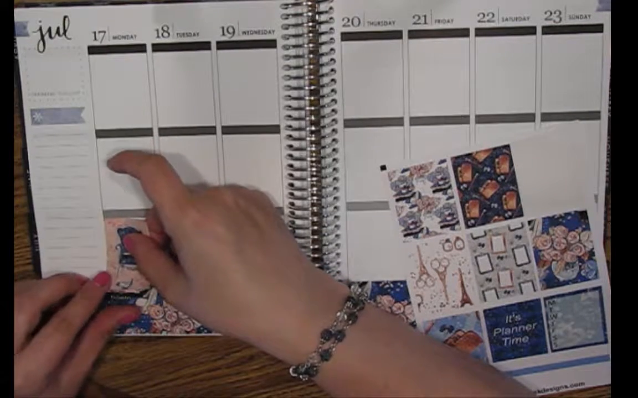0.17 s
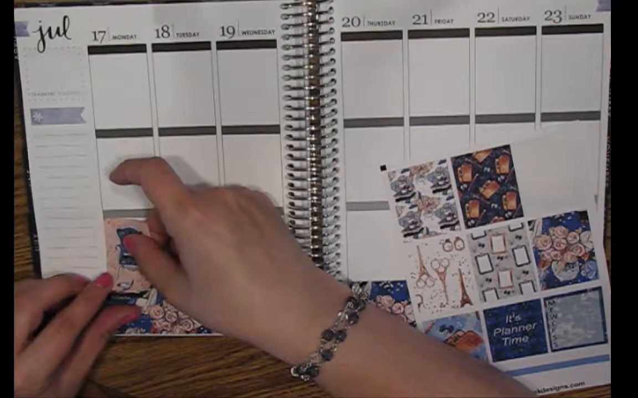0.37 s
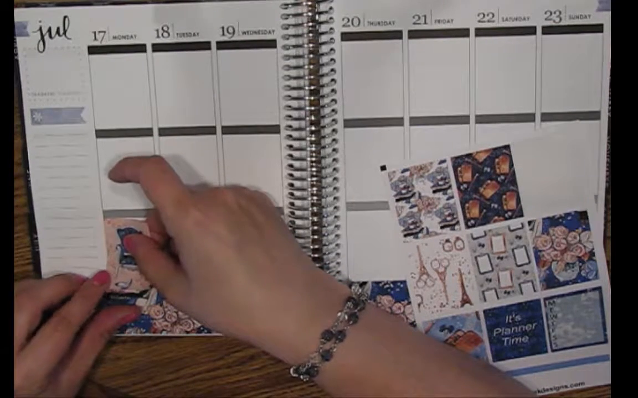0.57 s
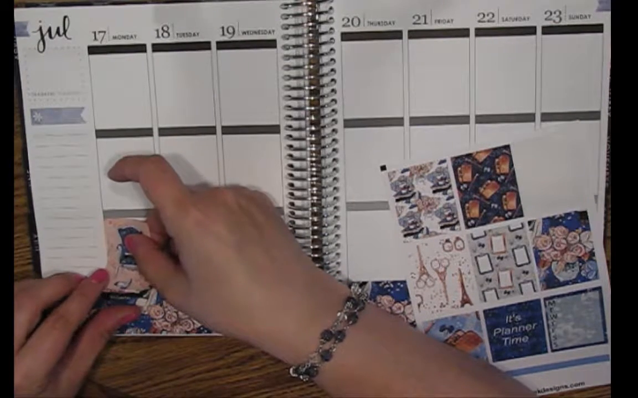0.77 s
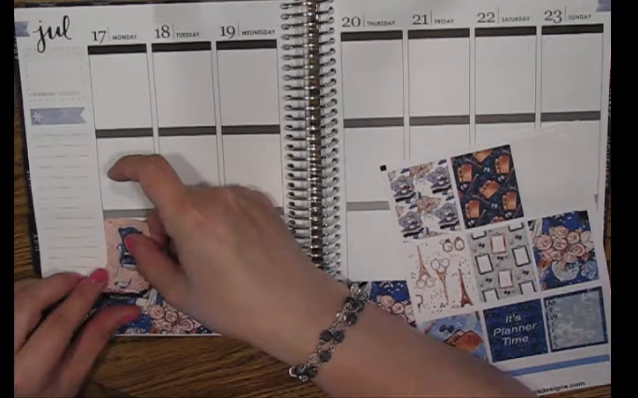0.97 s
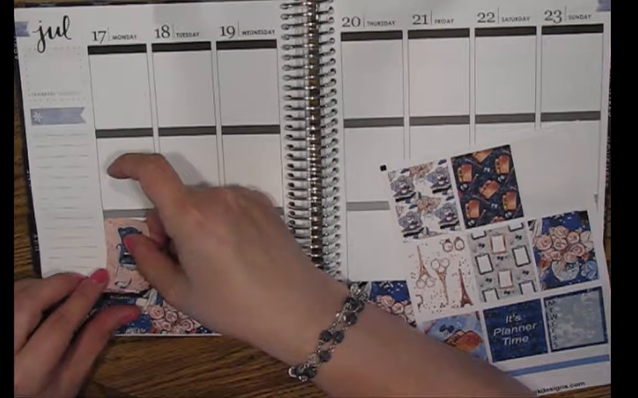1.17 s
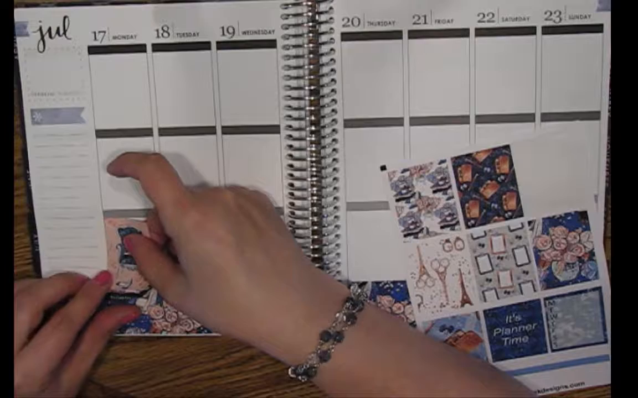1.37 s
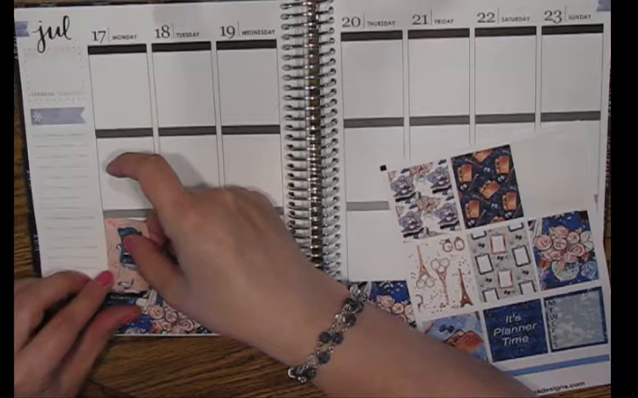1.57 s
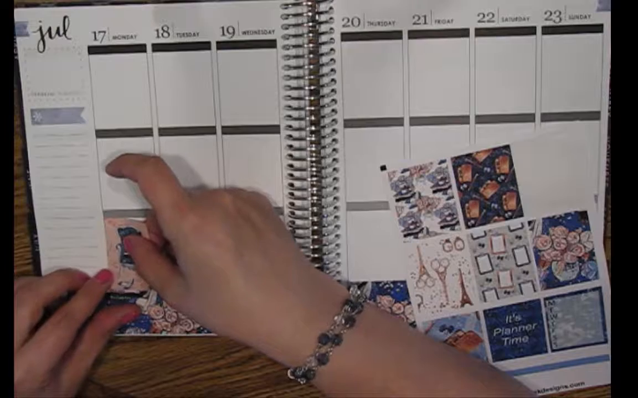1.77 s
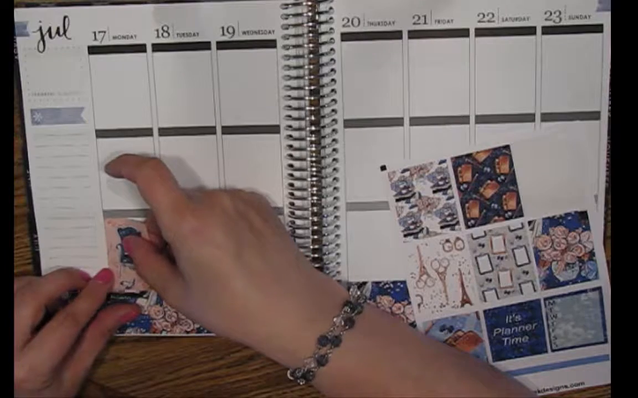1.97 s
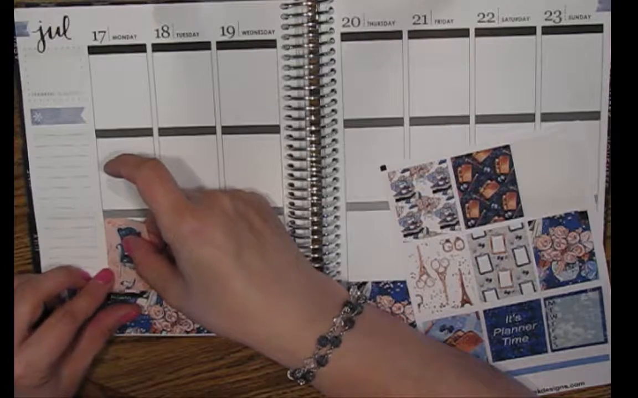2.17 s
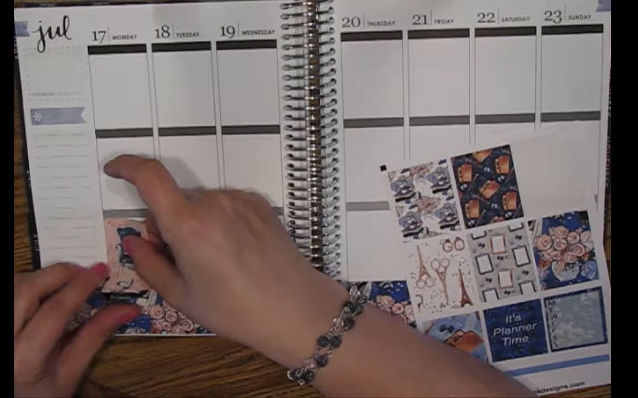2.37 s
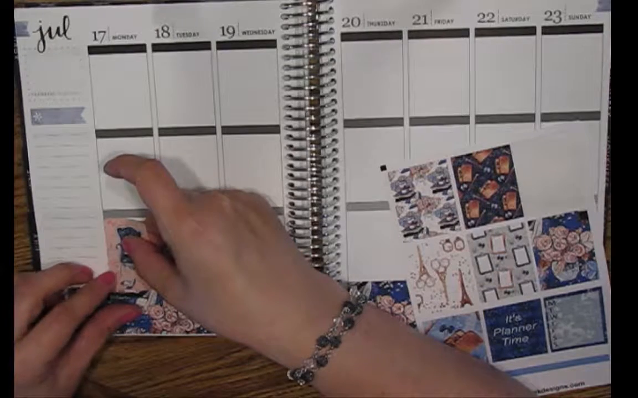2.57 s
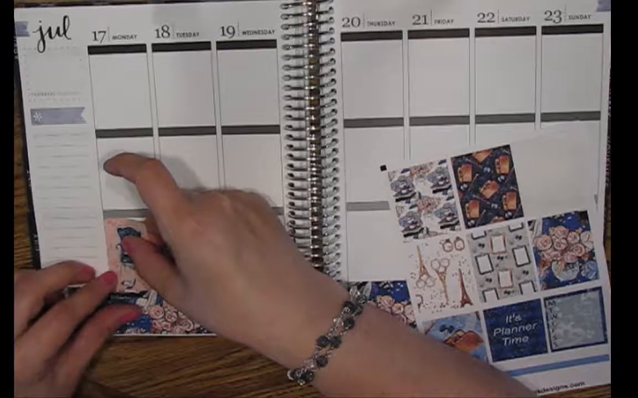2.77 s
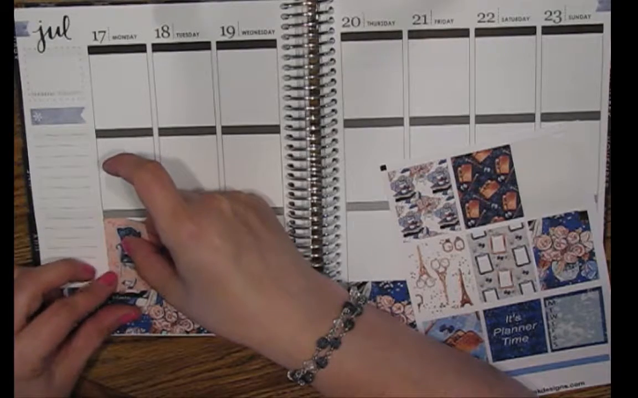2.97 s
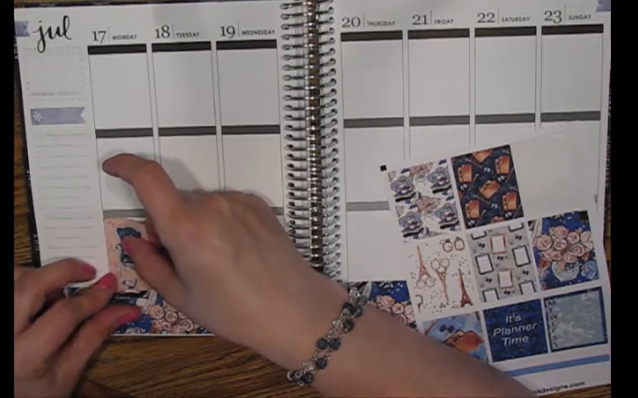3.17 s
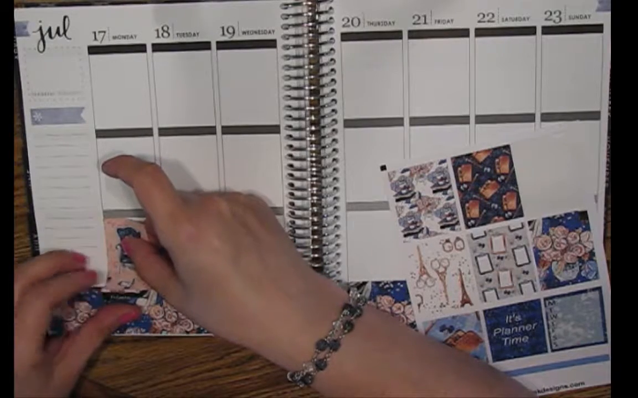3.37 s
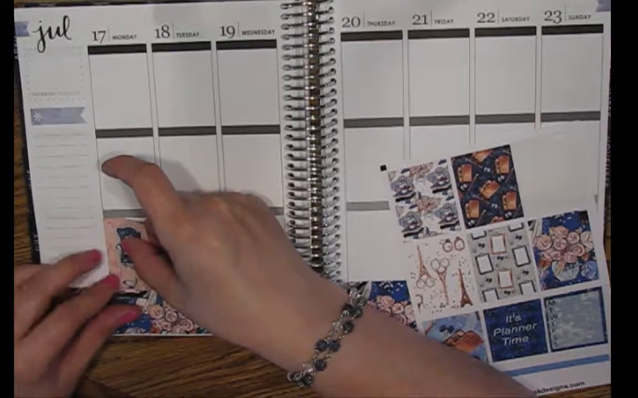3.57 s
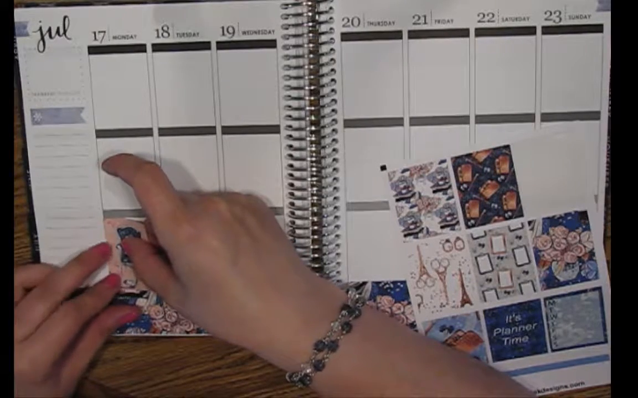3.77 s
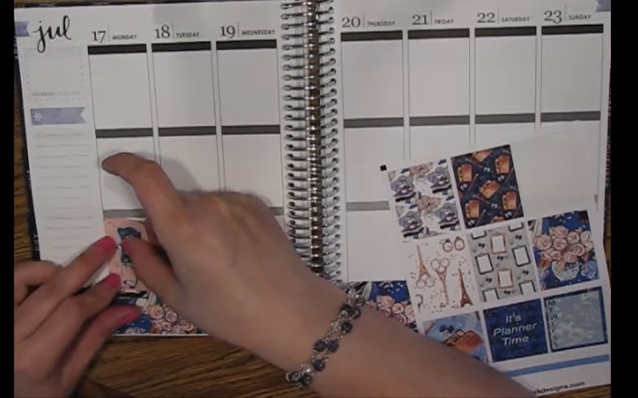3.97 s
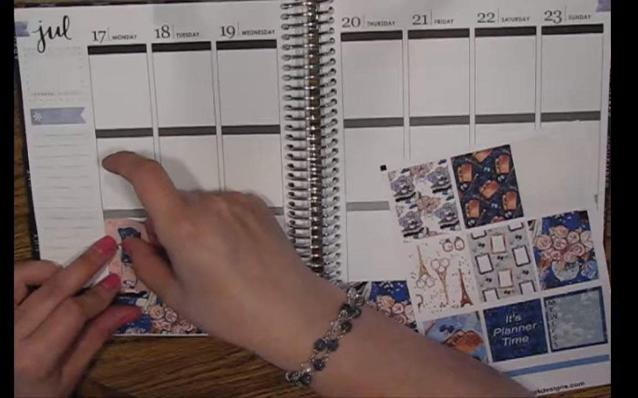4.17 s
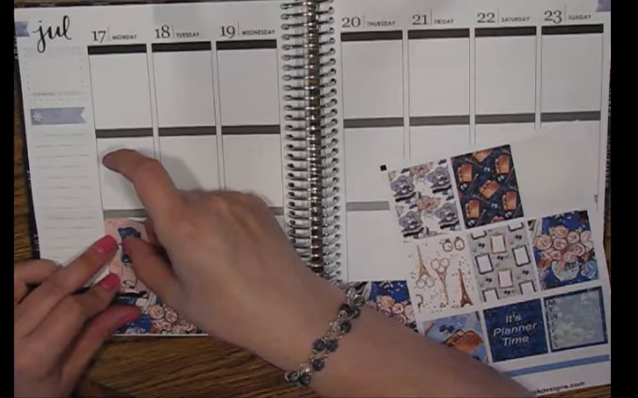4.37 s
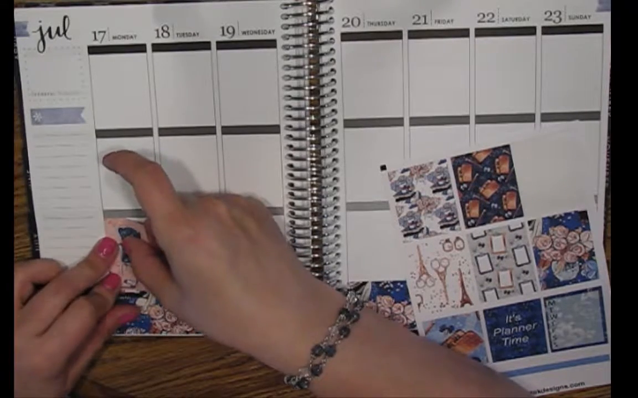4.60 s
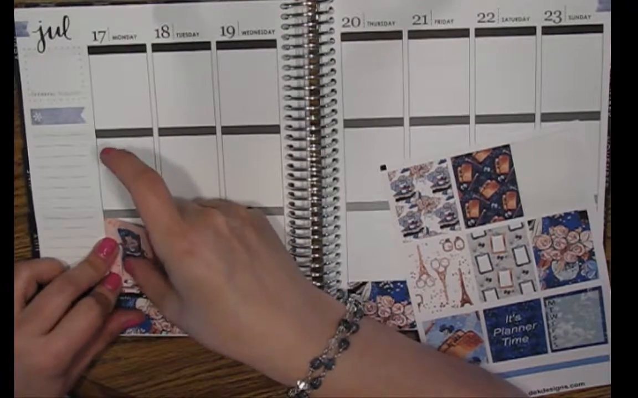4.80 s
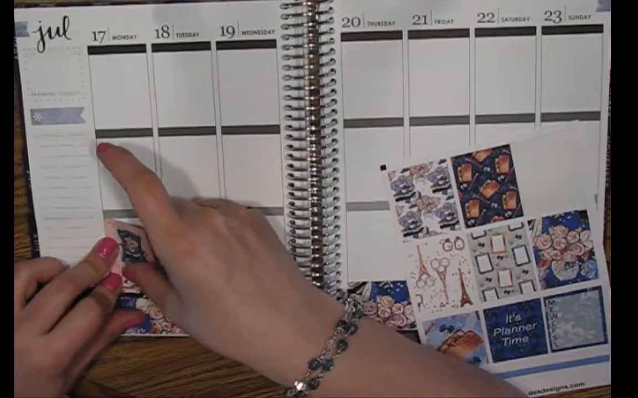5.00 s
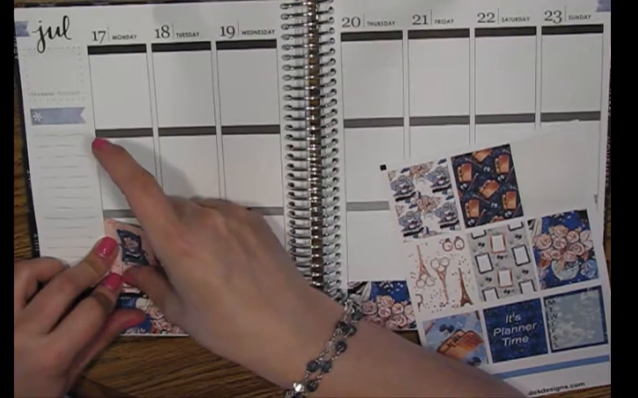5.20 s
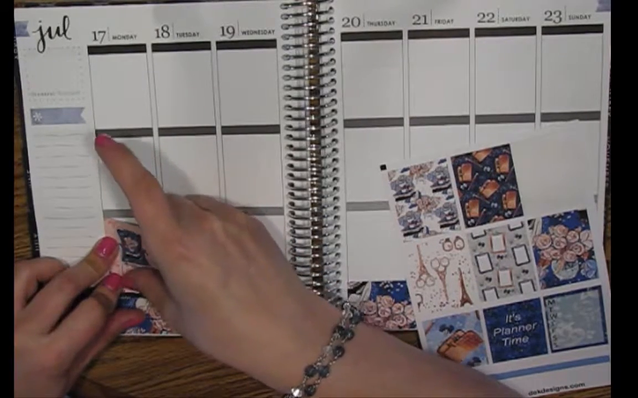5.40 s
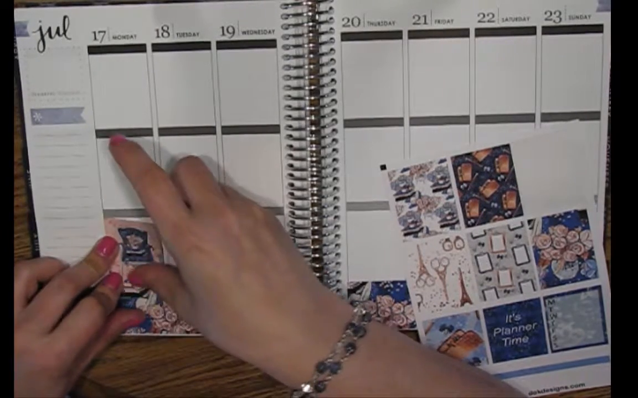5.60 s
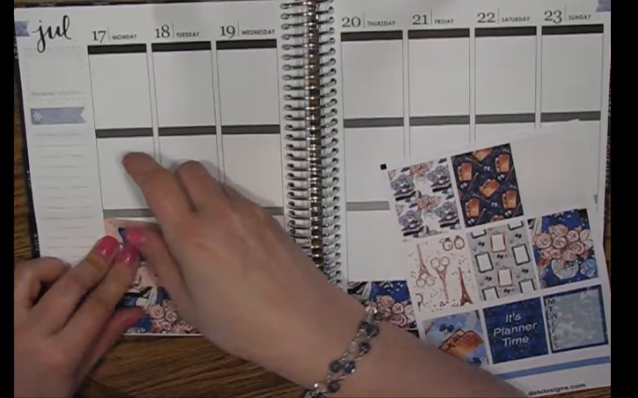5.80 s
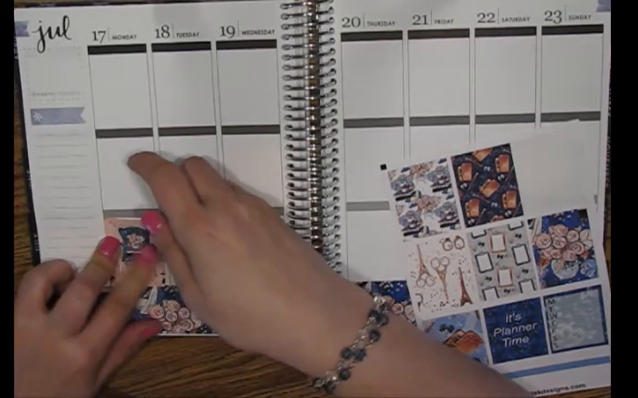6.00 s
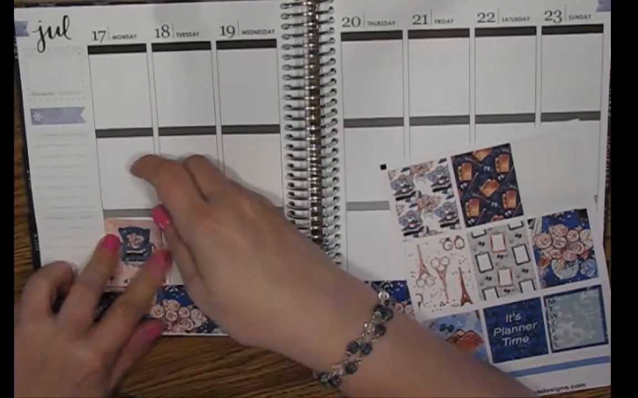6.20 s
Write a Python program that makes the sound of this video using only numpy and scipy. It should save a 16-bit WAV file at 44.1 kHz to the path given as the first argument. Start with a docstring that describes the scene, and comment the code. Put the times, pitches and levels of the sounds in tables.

```python
"""Fingertips press and smooth a paper sticker onto a planner page on a wooden desk in a small room.
Glue and stiff paper tick, as sharp breaks with short crackles, and once snap loudly with a dying peel;
skin rustles over the page as dense grains, and hard presses knock as short ringing tones.
Behind it an appliance hums at twice the mains rate, over a drone of moving air and a faint high whine,
made of steady tones, coloured noise and noise through narrow resonances."""
import sys
import numpy as np
from scipy import signal
from scipy.fft import rfft, irfft
from scipy.io import wavfile

SR = 44100
rng = np.random.default_rng(int(sys.argv[2]) if len(sys.argv) > 2 else 0)


def transcribe(signal):
    """Save signal, clipped to [-1, 1], as a 16-bit WAV file at the path in sys.argv[1]."""
    frames = np.atleast_2d(signal).T
    limited = np.clip(frames, -1, 1)
    pcm = np.round(limited * 32767).astype(np.int16)
    wavfile.write(sys.argv[1], SR, pcm)


N = 275492

# steady wash of moving air, spectrum shape: pitch_hz, level_db (per Hz)
AIR_SPECTRUM = [(20, -21), (60, -21), (90, -10.5), (170, -9), (250, -10.5), (295, -17.5), (570, -23),
                (1030, -26), (1150, -32.5), (2000, -41), (4000, -47), (8000, -52.5), (10000, -55),
                (16000, -63)]
# air noise ringing in duct and room: pitch_hz, width_hz (of one pass), level_db (rms)
DRONE_MODES = [(242, 45, -61), (350.7, 58, -56.5), (491, 33, -53), (635.6, 90, -62), (764.5, 65, -68),
               (1012.7, 29, -68)]
# faint high whine: pitch_hz, width_hz (of one pass), level_db (rms)
WHINE_MODES = [(7340, 160, -85.5), (7910, 600, -86), (8250, 49, -99)]
# appliance hum: pitch_hz, level_db (rms)
HUM_TONES = [(119.9, -43.5), (479.6, -61)]
# short scuffs of a fingertip starting or stopping: start_s, level_db (rms), hold_s (from the start)
SCUFF_EVENTS = [(.88, -77, .04), (.96, -75, .04), (1.46, -78, .03), (1.93, -76, .03), (2.496, -69.5, 0.058),
                (2.66, -63, 0.017), (3.395, -69, 0.019), (3.513, -64, 0.023), (3.577, -71, 0.026),
                (3.66, -72, .015), (3.785, -64.5, .012), (3.975, -75, .015), (4.006, -69, .015),
                (4.581, -74.5, .015), (4.824, -57, 0.02), (4.89, -63, .012), (4.927, -58, 0.013),
                (4.995, -61.5, 0.021), (5.052, -65, 0.033), (5.279, -55, 0.016), (5.335, -63, 0.019),
                (5.441, -56.5, 0.022), (5.556, -57, 0.011), (5.641, -57.5, 0.016), (6.153, -59, .015),
                (6.21, -60, .04)]
# scuff colour: pitch_hz, level_db (per Hz)
SCUFF_SPECTRUM = [(1200, -18), (3000, -16), (4300, -9), (5050, 0), (5800, -10), (6800, -4), (7700, 0),
                  (8600, -10), (10500, -21), (13000, -22), (16000, -34)]
# strokes of skin sliding on the page: start_s, length_s, level_db (rms before the sag)
STROKE_EVENTS = [(2.898, 0.18, -71), (3.538, 0.19, -69.5), (3.96, 0.098, -66.5), (4.822, 0.27, -59.5),
                 (5.412, 0.22, -63), (5.666, 0.41, -57.5), (6.164, 0.36, -54.5)]
# stroke colour: pitch_hz, level_db (per Hz)
RUSTLE_SPECTRUM = [(1200, -2), (2800, -12), (4000, -4), (5000, -8.5), (6000, -4.5), (7500, 1), (8300, -4.5),
                   (9000, -10), (10500, -21), (13000, -17), (16000, -36)]
# dull knocks of the pad under the page when a press lands hard:
# start_s, level_db (peak), pitch_hz, decay_cycles (until 60 dB down)
KNOCK_EVENTS = [(2.52, -47, 860, 11), (3.479, -41, 700, 11), (4.924, -43, 700, 9), (5.002, -45, 942, 2),
                (5.28, -44, 1410, 9), (5.349, -35, 1250, 17), (5.349, -43, 2250, 10), (5.39, -47, 1250, 8),
                (5.482, -45, 1360, 14), (5.5615, -46, 1000, 2.5), (5.6736, -34.5, 733, 58),
                (5.6755, -35, 470, 24), (5.674, -40, 600, 18), (5.673, -38, 920, 14),
                (6.1565, -44, 1030, 2.5), (6.216, -50, 1030, 3)]
# paper ticks and snaps: start_s, level_db (peak of the crackle), tilt_db (per octave),
# sizzle_db and body_db (peaks relative to level_db)
TICK_EVENTS = [(2.521, -44, -6.5, -20, -6), (2.66, -48, -2, -25, -12), (2.675, -50, 8, -30, -25),
               (2.901, -35.5, -5, -35, -13), (3.4425, -54, 9, -17, -10), (3.479, -37.5, -3, -22, -11),
               (3.4852, -47, 1, -30, -20), (3.5075, -44, 14, -30, -25), (3.515, -39.5, 1, -37, -23),
               (3.5195, -46, -6, -35, -25), (4.004, -47, -1, -30, -15), (4.781, -57, 2, -20, 2),
               (4.825, -50, 1, -20, -15), (4.896, -50, 6, -25, -15), (4.924, -43, 6, -30, -15),
               (4.937, -44, 8, -30, 1.5), (4.953, -51, 3, -26, 2), (5.001, -48, 10, -25, -2),
               (5.2478, -58, -12, -25, 4), (5.279, -40, 5, -22, -7), (5.349, -64, -12, -34, 20),
               (5.483, -52, -11, -22, 7), (5.5606, -38.5, 5, -9, -2), (5.6736, -5, 0.5, -34, -35),
               (5.6764, -9.5, 2.5, -35, -44), (5.6781, -15, -5, -35, -44), (5.683, -17, 2, -35, -40),
               (5.6859, -18, -3, -35, -40), (5.6899, -22.5, 4, -35, -40), (5.853, -34, 3, -18, -25),
               (5.867, -32, 5, -17, -25), (5.967, -44, 6, -24, -17), (6.1573, -39, 4, -13, -4),
               (6.216, -34.5, -1, -11, -7), (6.2434, -41, -1.5, -20, -15)]
# smoother, less resonant colour of the small ticks: pitch_hz, level_db (per Hz)
SMALL_TICK_SPECTRUM = [(1500, -35), (2800, -25), (3400, -10), (4400, -1), (5200, -3.5), (6000, -10),
                       (7000, 0), (7900, -3), (8700, -13), (9300, -22), (10500, -40), (16000, -91)]
# colour of the loud snaps: pitch_hz, level_db (per Hz)
SNAP_SPECTRUM = [(1500, -36.5), (2950, -35), (3400, -10), (3780, -16), (4070, -9), (4350, -10.5),
                 (4800, 1.5), (5300, -6), (5700, -8), (6150, -7), (6600, -6), (7300, 0), (8100, -5),
                 (8700, -13.5), (9300, -29), (10500, -48), (16000, -91)]
# colour of the peeling crackle: pitch_hz, level_db (per Hz)
PEEL_SPECTRUM = [(900, -22), (1500, -13), (2900, -16), (3500, -5), (4050, 4), (4800, 1), (5570, 6),
                 (7400, 2), (8300, -1), (8900, -37), (11000, -52), (13000, -23), (16000, -45)]
# resonances of the sheet: pitch_hz, width_hz (of one pass), level_db (relative)
SHEET_MODES = [(3710, 52, -5), (4030, 100, -4), (4410, 37, -1), (4730, 160, -1), (5060, 84, -5),
               (5400, 53, 3), (5700, 50, -2), (6020, 38, -5), (6790, 40, -10), (7100, 41, -4),
               (7460, 68, -3), (7950, 150, -7)]
# desk reflection: delay_s, level_db (relative to direct)
DESK_ECHOES = [(.0027, -17)]

AIR_DB = -48.5  # rms
SWELL_HZ, DRONE_SWELL_DB, WHINE_SWELL_DB = (1.55, 7), 2.0, 2  # swell rates; rms swings
HUM_WAVER_DB = 0.3  # rms swing
GRAINS_PER_S, GRAIN_SPREAD_DB = 10000, 2.5
CLUMPS_HZ, RUB_CLUMPS_DB, PEEL_CLUMPS_DB = (17, 90), 2, 2.2  # bunching rates; rms swings
SCUFF_RISE_S, SCUFF_FADE_S = 0.0012, 0.011
STROKE_ATTACK_S, STROKE_SAG_DB, STROKE_RELEASE_S = 0.037, 3, 0.13
# crackle decay time at a reference tick level; it doubles for so many dB more
CRACKLE_S, CRACKLE_AT_DB, CRACKLE_DOUBLES_DB = 0.00096, -40, 40
SNAP_FROM_DB = -25
BODY_HZ, SIZZLE_HZ = (1010, 4600), (11600, 14300)  # page flexing under a tick; top sizzle
# the glue keeps letting go after the snap; level is the crackle's rms before its rise and decay
PEEL_S, PEEL_DB, PEEL_RISE_S, PEEL_T60_S = 5.684, -33.5, 0.019, 0.5
PEEL_PER_S, PEEL_SPREAD_DB = 7600, 3
SHEET_DB, SHEET_SWELL_DB = -2, 4  # ringing relative to crackle; rms swing of each resonance
ROOM_T60_S, ROOM_RISE_S, ROOM_DB = 0.57, 0.012, -14  # tail energy relative to direct
CUTOFF_HZ = 15750


def from_db(db):
    """Decibels to gain."""
    return 10 ** (np.asarray(db) / 20)


def rms_one(x):
    """Scale to rms 1."""
    return x / np.sqrt(np.mean(x ** 2) + 1e-20)


def coloured(x, spectrum):
    """Causal (minimum-phase) filter with the given dB-per-Hz shape."""
    hz, db = np.transpose(spectrum)
    grid = np.maximum(np.fft.rfftfreq(8192, 1 / SR), 1)
    shape_db = np.interp(np.log(grid), np.log(hz), db)
    # folding the cepstrum forward in time makes the response minimum-phase
    cepstrum = irfft(np.log(from_db(shape_db)))
    cepstrum[1:4096] *= 2
    cepstrum[4097:] = 0
    response = irfft(np.exp(rfft(cepstrum)))
    return signal.fftconvolve(x, response)[:N]


def band(x, edges_hz, order):
    """Butterworth band-pass."""
    sos = signal.butter(order, edges_hz, "band", fs=SR, output="sos")
    return signal.sosfilt(sos, x + 1e-18)


def ringing_noise(modes, swell_db):
    """White noise goes twice through each resonance, which swells and sinks irregularly on its own."""
    settle = 9000  # samples dropped while the resonance builds
    out = np.zeros(N)
    for hz, width_hz, db in modes:
        r = np.exp(-np.pi * width_hz / SR)
        section = [1, 0, -1, 1, -2 * r * np.cos(2 * np.pi * hz / SR), r * r]
        swell = rms_one(band(rng.standard_normal(N + SR), SWELL_HZ, order=1)[SR:])
        noise = rng.standard_normal(N + settle)
        ringing = signal.sosfilt([section, section], noise)[settle:]
        out += from_db(db) * rms_one(from_db(swell_db * swell) * ringing)
    return out


def grains(per_s, spread_db, clumps_db, spectrum):
    """Random clicks of uneven size that come in bunches, coloured; rms 1."""
    sizes = from_db(spread_db * np.minimum(rng.exponential(1, N), 5))
    signed = sizes * rng.choice([-1, 1], N)
    clumps = from_db(clumps_db * rms_one(band(rng.standard_normal(N), CLUMPS_HZ, order=1)))
    fires = rng.random(N) < per_s / SR
    return rms_one(coloured(clumps * signed * fires, spectrum))


def add(out, sound, s, db):
    """Mix a short sound into out at time s with the given peak level."""
    at = round(s * SR)
    part = out[at:at + len(sound)]
    part += from_db(db) * sound[:len(part)] / np.abs(sound).max()


def air():
    """Moving air as steady noise, strongest in the lows."""
    return from_db(AIR_DB) * rms_one(coloured(rng.standard_normal(N), AIR_SPECTRUM))


def drone():
    """Air noise rings in duct and room resonances."""
    return ringing_noise(DRONE_MODES, DRONE_SWELL_DB)


def whine():
    """Noise in high resonances makes a faint, uneven whine."""
    return ringing_noise(WHINE_MODES, WHINE_SWELL_DB)


def hum():
    """Appliance tones at twice the mains rate and a multiple of it, their level wavering a little."""
    t = np.arange(N) / SR
    waver = rms_one(band(rng.standard_normal(N + 2 * SR), (1.5, 6), order=1)[2 * SR:])
    tones = sum(from_db(db) * np.sin(2 * np.pi * hz * t) for hz, db in HUM_TONES)
    return np.sqrt(2) * from_db(HUM_WAVER_DB * waver) * tones


def rub():
    """Skin ridges catch on paper fibres: dense uneven grains under long strokes and sudden scuffs."""
    t = np.arange(N) / SR
    stroke_level, scuff_level = np.zeros((2, N))
    for s, db, hold in SCUFF_EVENTS:
        rise = np.clip((t - s) / SCUFF_RISE_S, 0, 1)
        fade = np.exp(-np.maximum(t - s - hold, 0) / SCUFF_FADE_S)
        scuff_level += from_db(db) * rise * fade
    # a stroke swells in, sags, then lifts off
    for s, length, db in STROKE_EVENTS:
        attack = np.clip((t - s) / STROKE_ATTACK_S, 0, 1)
        sag = from_db(-STROKE_SAG_DB * np.clip((t - s) / length, 0, 1))
        release = np.exp(-np.maximum(t - s - length, 0) / STROKE_RELEASE_S)
        stroke_level += from_db(db) * attack * sag * release
    strokes = stroke_level * grains(GRAINS_PER_S, GRAIN_SPREAD_DB, RUB_CLUMPS_DB, RUSTLE_SPECTRUM)
    scuffs = scuff_level * grains(GRAINS_PER_S, GRAIN_SPREAD_DB, RUB_CLUMPS_DB, SCUFF_SPECTRUM)
    return strokes + scuffs


def knocks():
    """The pad under the page rings as a decaying tone when a press lands hard."""
    t = np.arange(3000) / SR
    out = np.zeros(N)
    for s, db, hz, cycles in KNOCK_EVENTS:
        decay = from_db(-60 * hz * t / max(cycles, 1))
        tone = np.sin(2 * np.pi * hz * t) * decay
        add(out, band(tone, (350, 2600), order=2), s, db)
    return out


def ticks():
    """Each tick is a sharp break with a short crackle behind it, longer for stronger breaks."""
    t = np.arange(3000) / SR
    out = np.zeros(N)
    for s, db, tilt_db, sizzle_db, body_db in TICK_EVENTS:
        decay_s = CRACKLE_S * 2 ** ((db - CRACKLE_AT_DB) / CRACKLE_DOUBLES_DB)
        decay = np.exp(-t / np.clip(decay_s, 0.0002, 0.015))
        burst = 0.33 * rng.standard_normal(len(t)) * decay
        burst[0] = 1  # the break itself
        spectrum = SNAP_SPECTRUM if db > SNAP_FROM_DB else SMALL_TICK_SPECTRUM
        # the tilt pivots at 5500 Hz
        tilted = [(hz, level + tilt_db * np.log2(hz / 5500)) for hz, level in spectrum]
        add(out, coloured(burst, tilted)[:len(t)], s, db)
        add(out, band(burst, SIZZLE_HZ, order=2), s, db + sizzle_db)
        add(out, band(burst, BODY_HZ, order=2), s, db + body_db)
    return out


def peel():
    """Glue lets go behind the snap: uneven crackle and ringing of the sheet die away together."""
    since = np.arange(N) / SR - PEEL_S
    rise = np.clip(since / PEEL_RISE_S, 0, 1)
    level = rise * from_db(PEEL_DB - 60 * np.maximum(since, 0) / PEEL_T60_S)
    crackle = grains(PEEL_PER_S, PEEL_SPREAD_DB, PEEL_CLUMPS_DB, PEEL_SPECTRUM)
    sheet = from_db(SHEET_DB) * rms_one(ringing_noise(SHEET_MODES, SHEET_SWELL_DB))
    return level * (crackle + sheet)


def room(x):
    """Direct sound, the desk's echo, then a diffuse tail that builds and dies."""
    t = np.arange(SR) / SR
    build = 1 - np.exp(-t / ROOM_RISE_S)
    tail = rng.standard_normal(SR) * build * from_db(-60 * t / ROOM_T60_S)
    response = from_db(ROOM_DB) * tail / np.sqrt(np.sum(tail ** 2))
    response[0] = 1  # direct sound
    for s, db in DESK_ECHOES:
        response[round(s * SR)] += from_db(db)
    return signal.fftconvolve(x, response)[:N]


def scene():
    """Hands in the room over the steady background."""
    background = air() + drone() + whine() + hum()
    hands = rub() + knocks() + ticks() + peel()
    return (room(hands) + background)[None]


def record(dry):
    """A steep low-pass cuts the top."""
    sos = signal.ellip(12, 0.5, 60, CUTOFF_HZ, fs=SR, output="sos")
    return signal.sosfilt(sos, dry)


dry = scene()
out = record(dry)
transcribe(out)
```